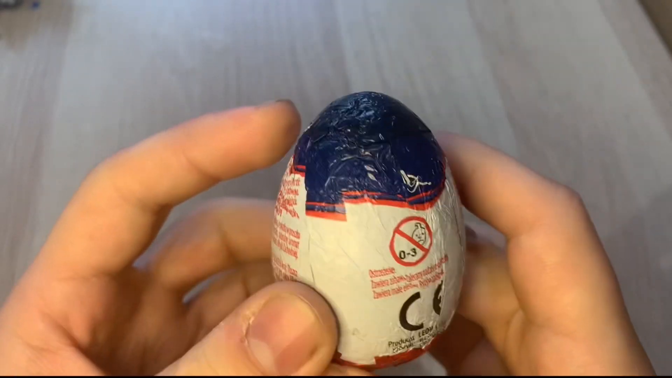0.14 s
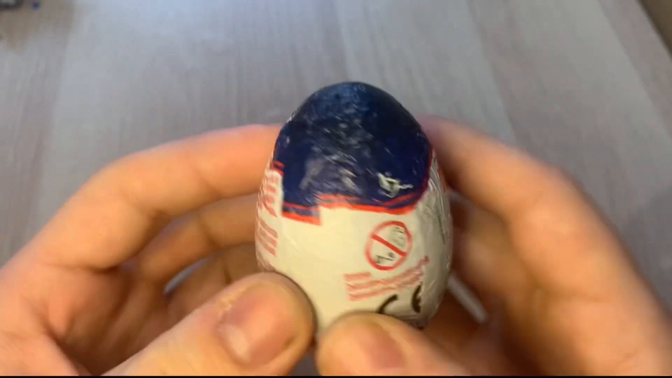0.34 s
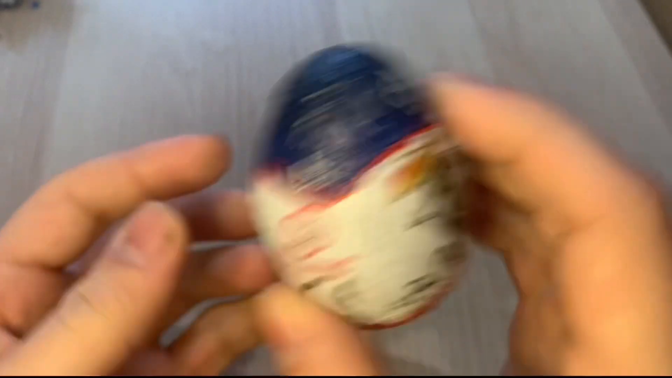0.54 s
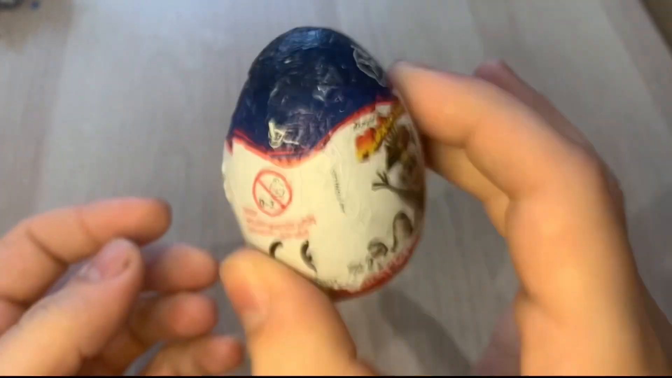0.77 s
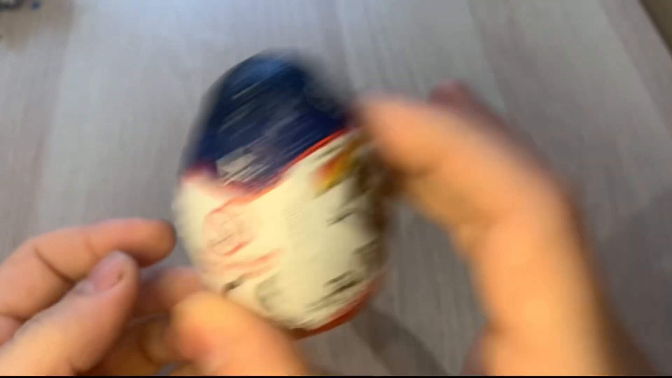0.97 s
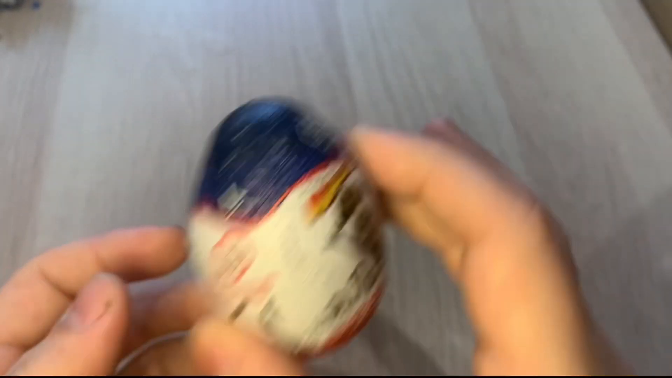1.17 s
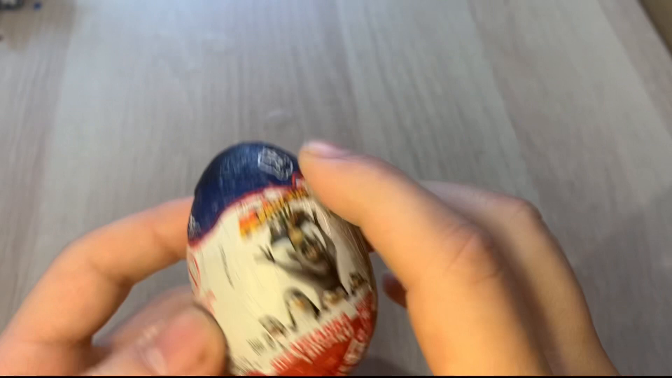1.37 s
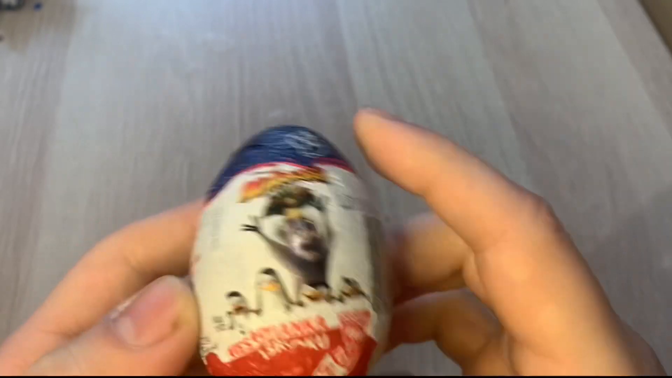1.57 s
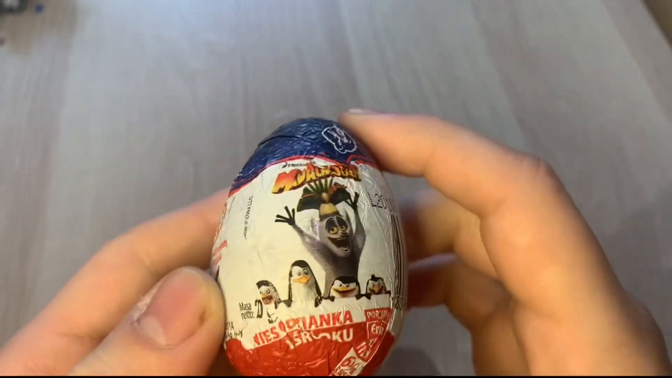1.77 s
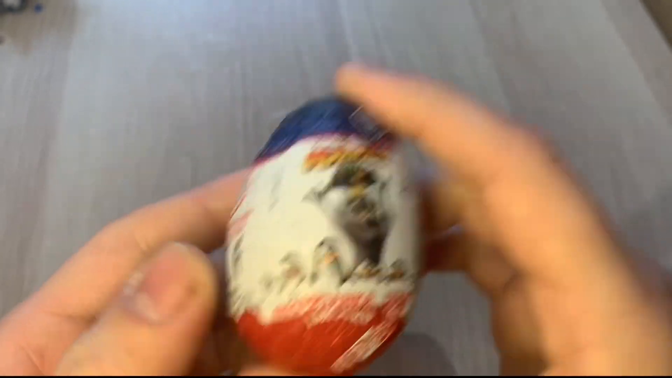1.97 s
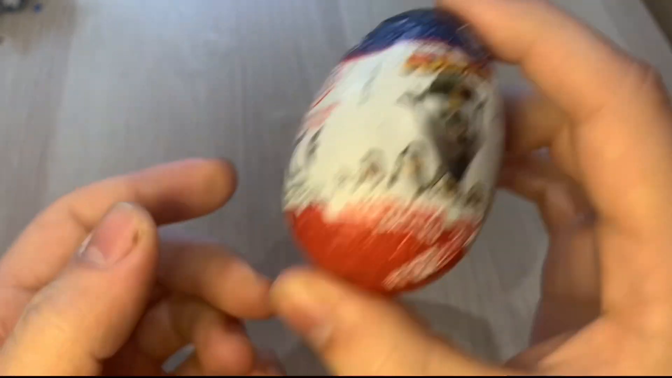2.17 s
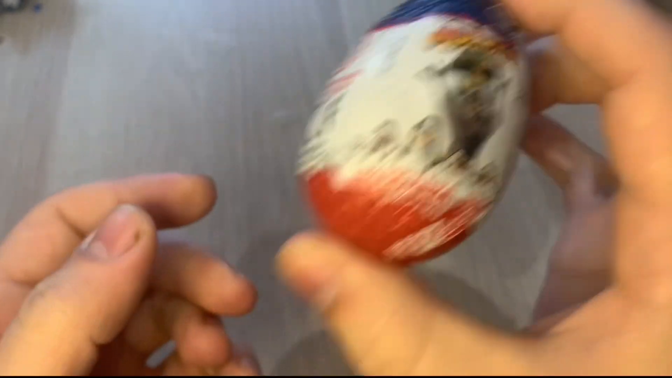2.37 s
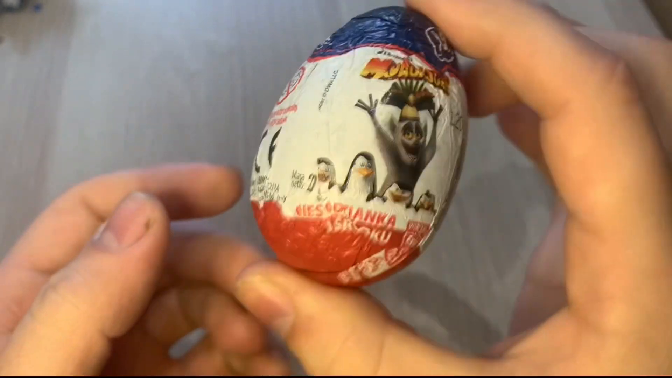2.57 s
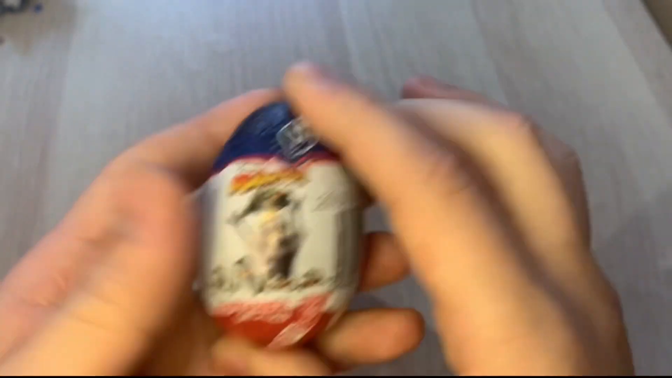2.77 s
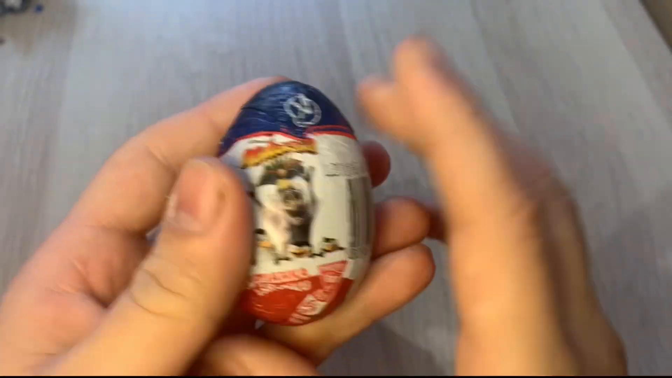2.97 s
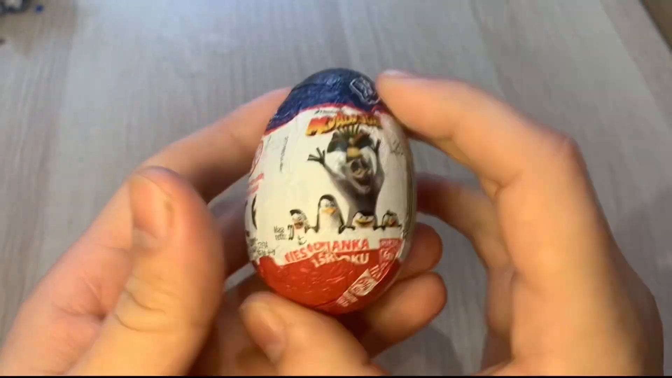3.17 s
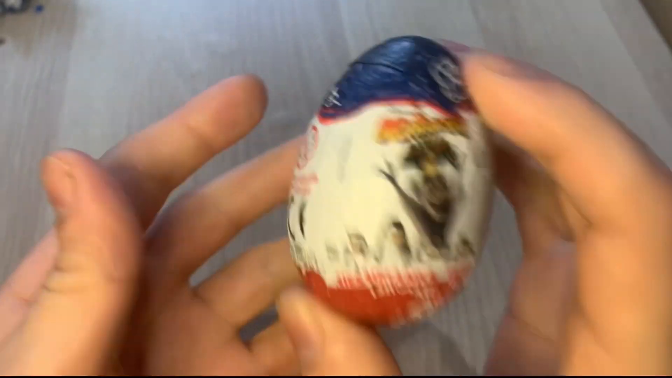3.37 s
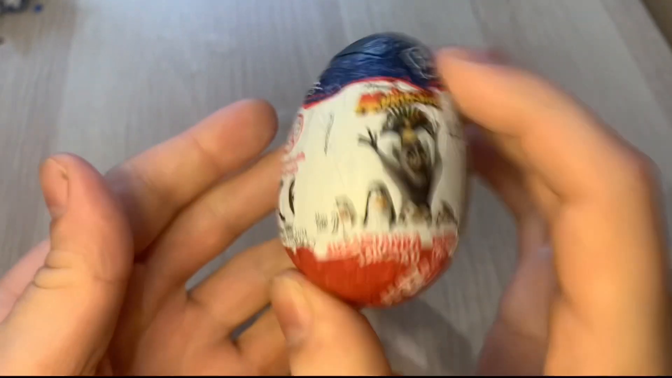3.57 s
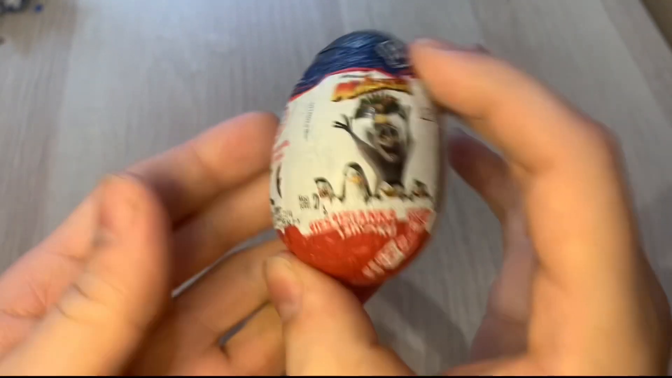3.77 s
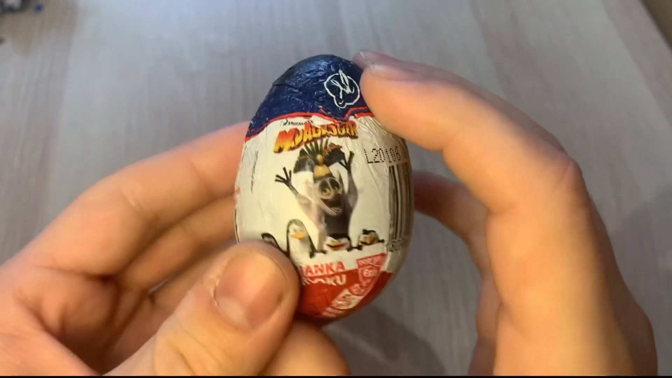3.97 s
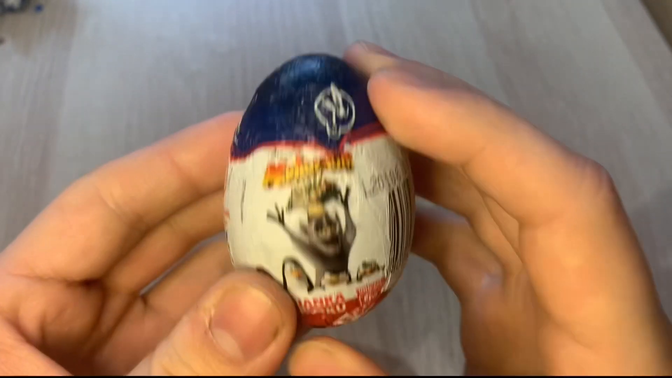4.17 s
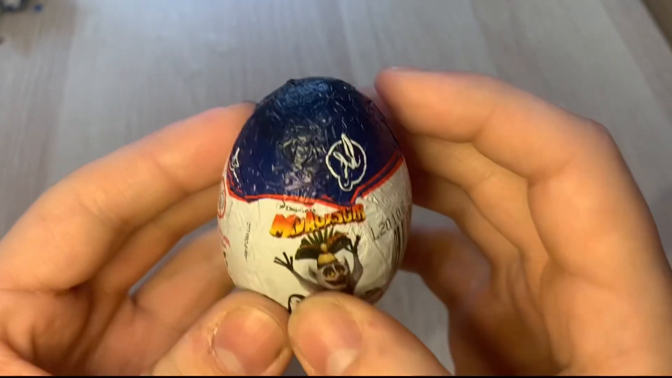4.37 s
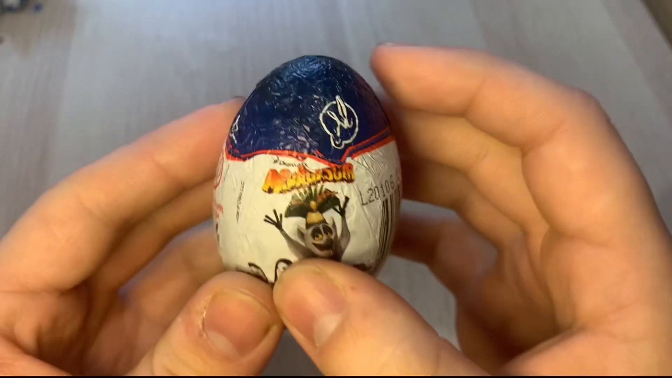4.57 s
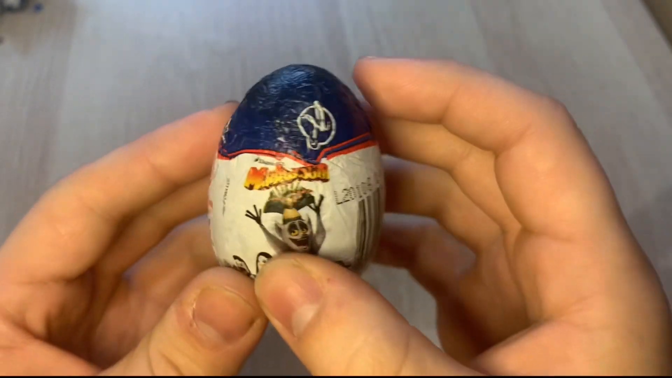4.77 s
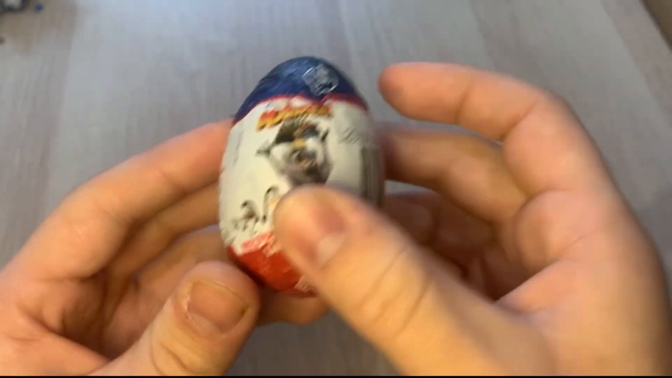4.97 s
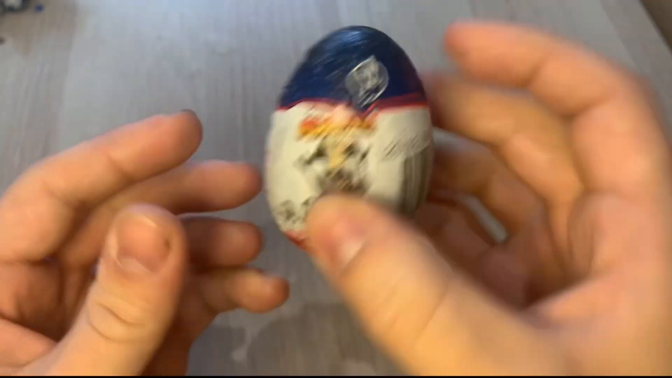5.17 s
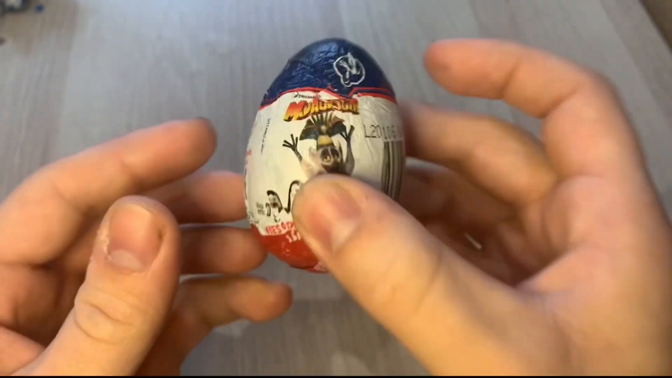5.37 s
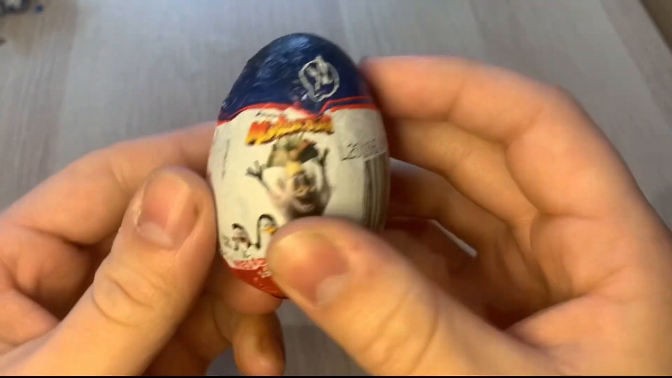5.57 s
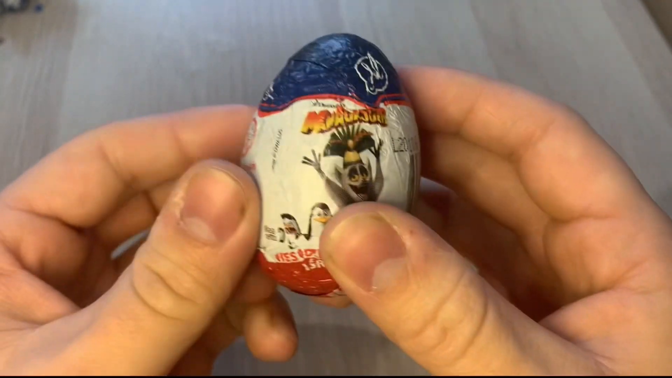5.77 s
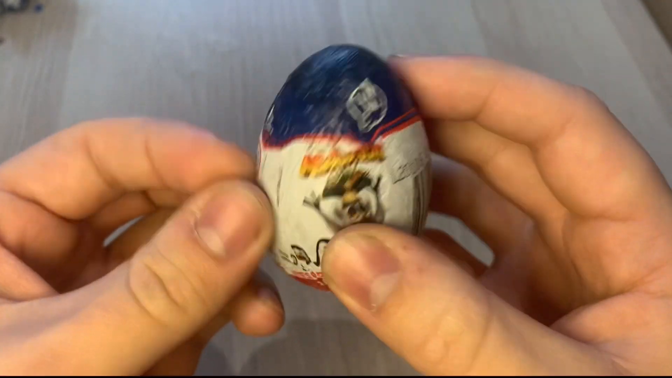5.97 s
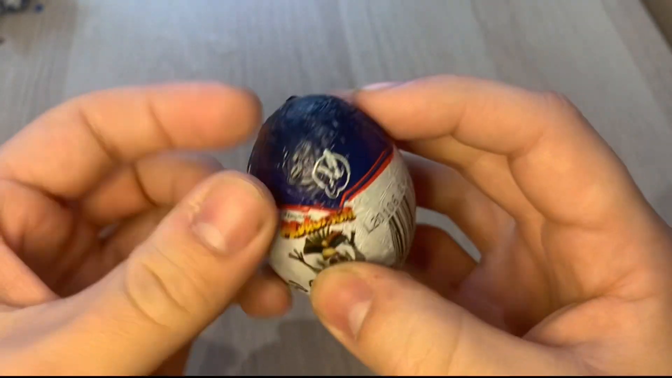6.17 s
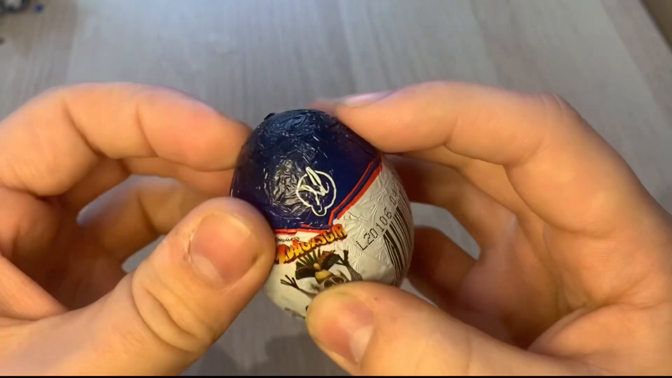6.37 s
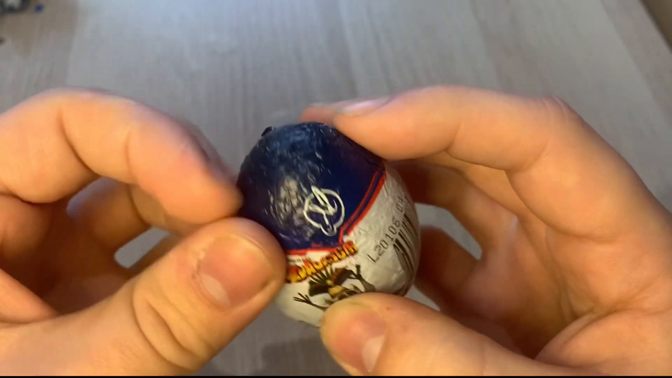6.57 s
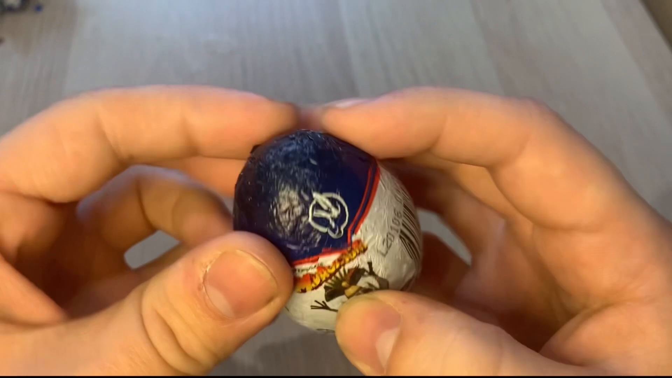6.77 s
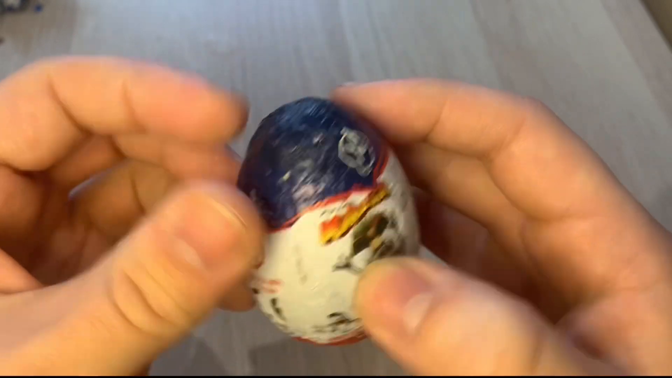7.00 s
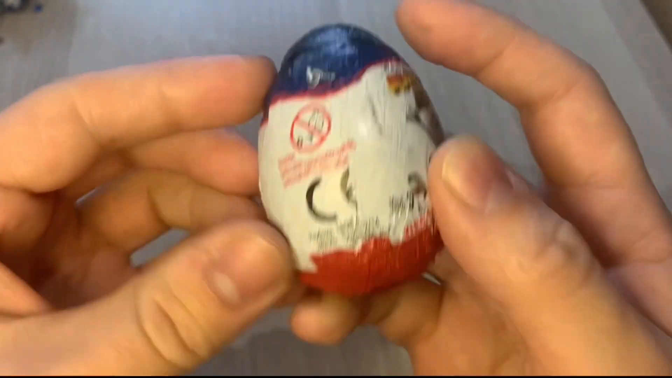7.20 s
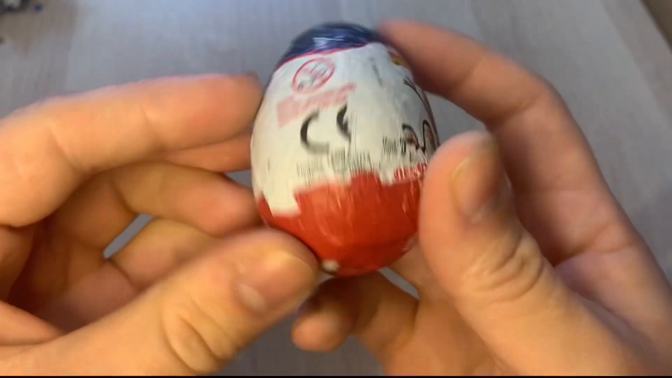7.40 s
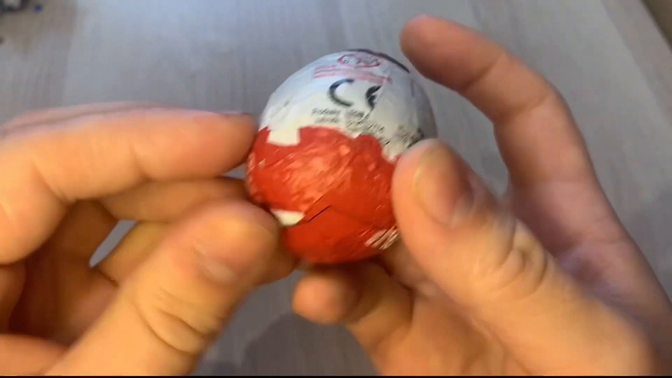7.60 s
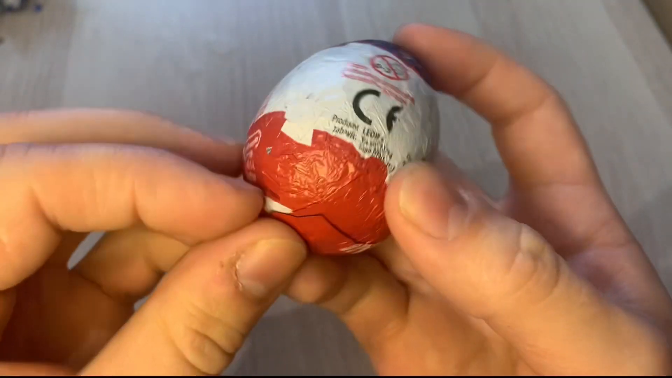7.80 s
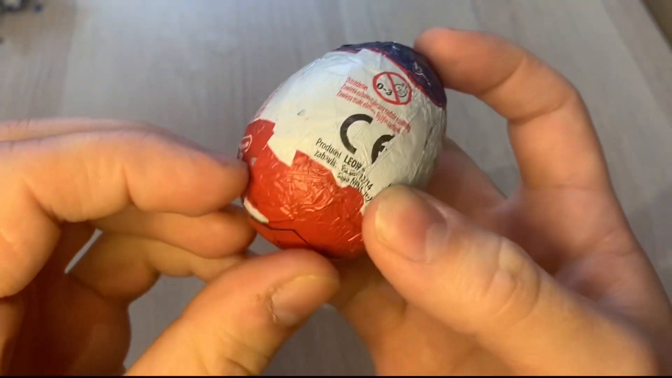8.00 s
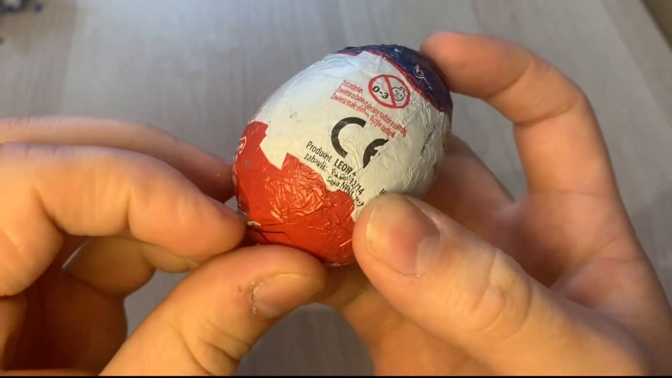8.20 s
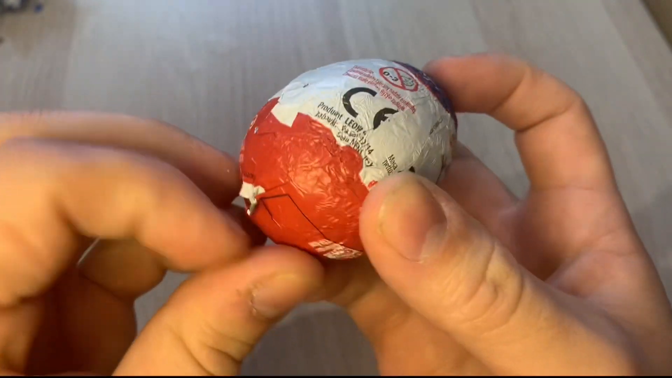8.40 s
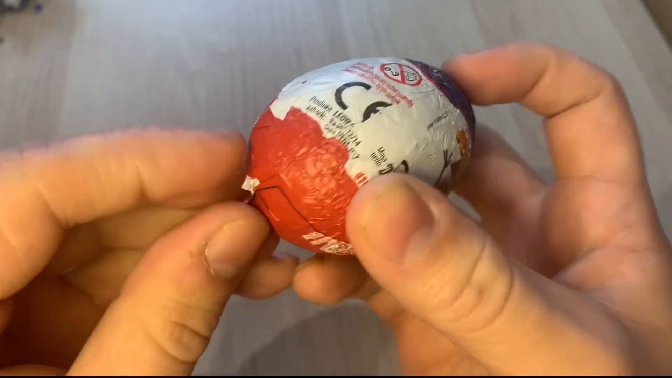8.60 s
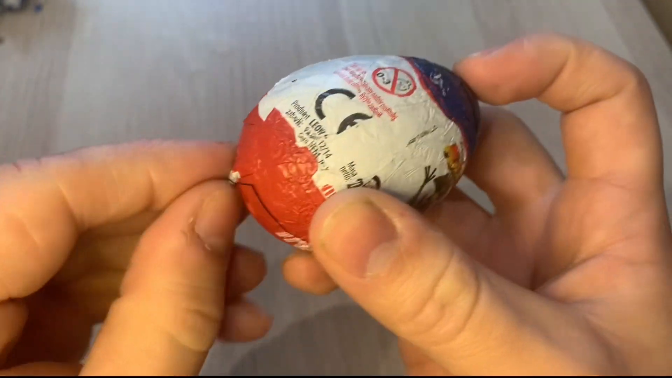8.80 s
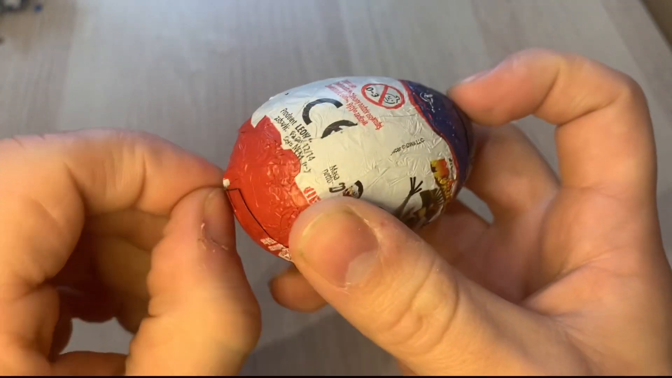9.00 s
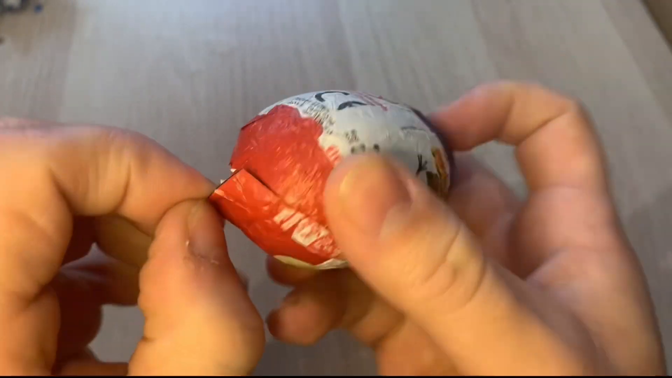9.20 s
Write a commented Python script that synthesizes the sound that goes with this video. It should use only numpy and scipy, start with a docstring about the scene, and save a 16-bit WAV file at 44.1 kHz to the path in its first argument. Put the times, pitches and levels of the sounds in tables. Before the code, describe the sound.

Hands handle a hollow foil-wrapped egg above a table, close to the microphone. Dry, woody-plastic knocks with crisp foil ticks come in four separate rattles, with soft table thumps and near silence between. Then the rattling stops and the foil crackles: clustered bright pops, small thuds on the shell and short scratchy strokes, ending with a few sharp snaps. Low room rumble stays underneath.

```python
"""In a quiet room, hands hold a foil-wrapped hollow egg above a table, close to a two-port microphone.
The egg is shaken four times: the capsule inside excites the damped modes of the shell and cracks the foil.
Then fingernails pick at the foil, whose creases pop as short noise pulses and rustle as dense random ones.
An arm bumps the table, a decaying low tone with a scrape, over mains hum, low rumble and faint hiss."""
import sys
import numpy as np
from scipy import signal
from scipy.fft import rfft, irfft, next_fast_len
from scipy.io import wavfile
from scipy.ndimage import uniform_filter1d

SR = 44100
rng = np.random.default_rng(int(sys.argv[2]) if len(sys.argv) > 2 else 0)


def inscribe(sig):
    """Save sig as 16-bit PCM at rate SR to the path in sys.argv[1].

    A 1-D sig is mono; a 2-D sig holds one channel per row.
    Samples are clipped to [-1, 1] before scaling.
    """
    pcm = np.round(np.clip(np.atleast_2d(sig).T, -1, 1) * 32767)
    wavfile.write(sys.argv[1], SR, pcm.astype(np.int16))


N = 407925

# room noise spectrum, before scaling to HUSH_DB: [f/Hz, level/dB]
HUSH_SPECTRUM = [(25, -23.5), (50, -10), (100, -17), (200, -20), (600, -32.5), (2000, -35.5), (7000, -36),
                 (16000, -33.5)]
# share of the room noise power common to both ports, limited to 0..1: [f/Hz, share]
HUSH_SHARED = [(60, 0.25), (200, 0.18), (1500, 0.091), (7000, 1)]
# phase by which the left port leads: [f/Hz, phase/rad]
PORT_LEAD = [(0, 0), (690, 1.5), (1460, 0.19), (2240, 1.11), (3620, 1.5), (16500, 20.5)]
# shading between the ports: [f/Hz, left minus right level/dB]
PORT_TILT = [(100, -1.5), (450, -7.5), (1400, -0.5), (3000, -2), (7000, 0.5)]
# reverberation time by band: [f/Hz, t60/s]
ROOM_T60 = [(300, 0.34), (2000, 0.14), (10000, 0.057)]
# arm on the table: [full weight t/s, landing time t/s, boom level/dB, scrape level/dB]
BUMPS = [(1.751, 0.06, -39, -40), (1.906, 0.15, -45, -59.5), (4.127, 0.016, -42, -69)]
# resonances of the scraped table top: [f/Hz, bandwidth f/Hz, relative level/dB]
TABLE_MODES = [(225, 44, 5), (331, 32, -1.5), (487, 63, 4), (584, 9.1, 4.5)]
# spectrum of the sleeve's own scrape: [f/Hz, relative level/dB]
SLEEVE_SPECTRUM = [(600, -7), (2100, -13.5), (5000, -33)]
# mean shell modes, before the chance of each blow: [ratio to ring frequency, relative level/dB, t60/s]
SHELL_MODES = [(.35, -19, 0.033), (.65, -5, 0.0074), (.9, 3, 0.012), (1.1, 6.5, 0.0063), (1.5, 0, 0.0095),
               (2.2, -9, 0.0078)]
# mean spectrum of a foil tick under a knock: [f/Hz, relative level/dB]
TICK_SPECTRUM = [(1500, -8.5), (3500, 3), (6500, 2), (9500, 1.5), (12000, -6.5), (16000, -8)]
# mean spectrum of picked and stroked foil: [f/Hz, relative level/dB]
FOIL_SPECTRUM = [(1200, -42.5), (2500, -20), (5000, -5.5), (8000, -2.5), (12000, -0.5), (16000, 3)]
# spectrum of skin on the hollow shell: [f/Hz, relative level/dB]
SCUFF_SPECTRUM = [(150, -3.5), (500, -6.5), (1400, 1), (2300, -4.5), (3500, -20), (6000, -29)]
# soft fingertip landings on the shell: [t/s, peak level/dB]
TAPS = [(4.148, -51), (4.4, -58), (7.712, -46), (7.766, -53), (7.883, -50.5), (8.543, -65)]
# a finger slips on the shell: (start t/s, count, mean interval t/s, mean peak level/dB)
CREAK = (5.522, 7, .0062, -47)
# finger strokes on the foil, before smoothing: [t/s, length t/s, fizz level/dB, scuff level/dB]
STROKES = [(0.177, 0.058, -67, -58.5), (0.426, 0.057, -56, -71), (1.341, 0.054, -57, -61),
           (1.405, 0.42, -72, -64.5), (4.274, 0.088, -67.5, -96), (5.433, 0.17, -86.5, -65.5),
           (5.741, 0.97, -67.5, -87), (5.748, 0.11, -69, -83), (5.957, 0.066, -52.5, -61),
           (5.979, 0.033, -43, -58.5), (6.031, 0.1, -56, -70.5), (6.209, 0.088, -52, -72),
           (6.51, 0.037, -49, -56.5), (6.641, 0.06, -55, -69), (6.728, 0.26, -61, -73.5),
           (6.847, 0.068, -41, -58), (6.93, 0.024, -47, -59), (7.201, 0.12, -52, -73),
           (7.523, 0.039, -57.5, -81), (7.711, 0.035, -67, -62), (7.767, 0.04, -57.5, -64.5),
           (7.817, 0.062, -57.5, -67.5), (7.934, 0.051, -57, -82), (7.985, 0.069, -67, -78),
           (8.053, 0.03, -45, -56), (8.099, 0.018, -41.5, -76), (8.288, 0.047, -39.5, -80),
           (8.5, 0.046, -59.5, -86), (8.603, 0.021, -51.5, -75), (8.757, 0.11, -68, -95),
           (9.208, 0.06, -41.5, -67.5)]
# single foil snaps under the nail, loud and faint: [t/s, peak level/dB, shell thud peak level/dB]
SNAPS = [(0.0573, -40.5, -76.0), (0.4, -36.5, -75), (2.9228, -33.5, -45), (3.054, -40, -44),
         (3.1108, -41, -56), (4.362, -40, -58.5), (5.8229, -36, -58), (5.888, -44, -76.0),
         (5.9567, -38, -59), (5.993, -37, -45.0), (5.9998, -31, -36.5), (6.0824, -40, -59.0),
         (6.11, -35.0, -58.0), (6.2156, -35, -62), (6.342, -34, -51.5), (6.5176, -28, -62),
         (6.627, -33, -68), (6.6453, -22.5, -53), (6.6822, -33, -67), (6.758, -37, -47),
         (6.7747, -34.5, -56), (6.7961, -30.5, -51.5), (6.838, -27, -51), (6.85, -36, -53),
         (6.8549, -40, -36.5), (6.8786, -35, -36), (6.889, -40, -37), (6.9054, -36, -47),
         (6.9298, -33, -67), (6.947, -29.5, -48), (7.178, -24, -41), (7.301, -45, -40), (7.327, -40, -54),
         (7.445, -43.5, -73), (7.64, -35, -60), (7.7212, -30, -33), (7.821, -35, -44), (7.834, -29, -37),
         (7.8577, -35, -51.0), (7.9905, -21, -70), (8.0615, -23, -49), (8.0735, -38, -54.0),
         (8.0997, -26.5, -52), (8.111, -32, -52), (8.2269, -43.5, -80), (8.2717, -39.5, -70),
         (8.294, -30, -37), (8.3285, -44, -69), (8.3408, -33, -62), (8.5088, -32, -73), (8.7956, -36, -71),
         (8.846, -40, -81.0), (8.9424, -34, -78), (8.9613, -37.5, -80), (9.1852, -33, -60),
         (9.1988, -23, -58), (9.209, -29.5, -48), (9.2387, -28, -46.5)]
# shakes, chatter before rebounds: [start t/s, end t/s, level at start/dB, level at end/dB]
SHAKES = [(0.533, 1.305, -49.5, -51), (2.135, 2.868, -59, -57), (3.447, 3.985, -50, -58),
          (5.163, 5.41, -53.5, -55)]
# single capsule knocks, loud ones in the shakes and faint ones between them:
# [t/s, peak level/dB, foil tick peak level/dB, shell ring f/Hz]
KNOCKS = [(0.1936, -38.5, -32, 710), (0.4107, -42, -66, 1200.0), (0.4644, -26, -33, 1190),
          (0.5384, -20, -16.5, 1620), (0.5469, -21.5, -14.5, 1250), (0.557, -20, -21, 1250),
          (0.5742, -23.5, -23, 1470), (0.5796, -19, -14.5, 1120), (0.6015, -26.5, -26.5, 885),
          (0.6102, -27, -52, 1090), (0.6305, -28, -35, 1510), (0.6519, -26.5, -34, 990),
          (0.6572, -23.5, -23.5, 1470), (0.667, -16.5, -15.5, 1510), (0.6738, -17, -17.5, 1160),
          (0.6999, -28, -30.5, 1070), (0.7218, -27.5, -19.5, 1180), (0.7396, -17, -22.5, 945),
          (0.7627, -18, -15.5, 1530), (0.7676, -18.0, -18.5, 1300), (0.8027, -21, -34.5, 1070),
          (0.8189, -15.5, -18.5, 980), (0.8559, -20.0, -25.5, 1610), (0.8621, -17, -18, 1220),
          (0.8715, -32, -24, 1280.0), (0.8838, -24.5, -19, 930), (0.8927, -20.5, -25.5, 1170),
          (0.931, -16, -14, 1480), (0.9369, -16, -18.5, 1120), (0.9617, -23, -23, 1480),
          (0.973, -13.5, -11, 1260), (0.9933, -18.5, -21, 1180), (1.0341, -23, -35.5, 1230.0),
          (1.0403, -20, -29, 970), (1.0842, -18, -22.5, 1180), (1.1003, -18, -13, 1450.0),
          (1.1145, -23, -39, 1040), (1.1523, -23, -31, 1190), (1.1777, -20, -21.5, 1220.0),
          (1.1828, -25.5, -26.5, 1240), (1.195, -19.5, -20.5, 1190), (1.2306, -24.5, -26, 1080),
          (1.2926, -19.5, -23.5, 1480), (1.3683, -36.5, -56, 700.0), (1.5723, -43, -44.5, 1380),
          (1.9282, -45, -54, 1260.0), (1.9775, -44.5, -52.5, 1255), (2.0761, -39, -40.5, 1080),
          (2.1146, -30, -61, 930), (2.1514, -24.5, -32, 855), (2.164, -25, -43, 1000.0),
          (2.2283, -31.0, -53, 1150), (2.2541, -27.5, -33.5, 870), (2.3025, -31.5, -34.5, 680),
          (2.3174, -30.5, -30, 740), (2.3583, -25.5, -20.0, 1070), (2.3661, -21.5, -27.5, 1020),
          (2.4515, -33, -42, 1140), (2.4682, -26.0, -31.5, 790.0), (2.5217, -29.5, -29.5, 670),
          (2.5278, -31.5, -37, 895), (2.5589, -22.5, -33, 860.0), (2.5724, -23, -22, 1030),
          (2.5862, -21, -32, 840), (2.6107, -28.5, -29, 824), (2.6685, -26, -34.5, 940),
          (2.6886, -24.5, -24.5, 850), (2.7154, -25.5, -57, 1030), (2.831, -25.5, -27.5, 880),
          (2.8807, -29.5, -32.5, 1570), (3.2878, -40, -47.5, 760.0), (3.4008, -15.5, -27.5, 1240),
          (3.4055, -16, -18.5, 1120), (3.4526, -20, -27.5, 1460), (3.4629, -17, -14, 1780),
          (3.5346, -13.5, -24.0, 1526), (3.5407, -23.5, -29, 1180), (3.5677, -23, -33, 750),
          (3.5812, -23.5, -41.5, 840.0), (3.6138, -15.5, -24, 1400), (3.6306, -17.5, -40, 980),
          (3.6435, -21.5, -20, 1650), (3.6535, -23.5, -39, 990), (3.665, -18, -19.5, 1610),
          (3.6833, -21.5, -36.5, 900), (3.7485, -18.5, -27, 1360), (3.7538, -17, -20.5, 1110.0),
          (3.7734, -20, -25, 950), (3.7891, -22, -28.5, 800.0), (3.7959, -21.5, -28.5, 1380),
          (3.864, -19.5, -32, 1230), (3.8932, -23.5, -23, 900), (3.9036, -24.5, -37.5, 1060.0),
          (3.9813, -26.0, -40.5, 1175), (5.1289, -24.5, -28.5, 1280), (5.1446, -24.5, -30.5, 1210),
          (5.1734, -23, -34.5, 1110), (5.2046, -30, -27, 1260), (5.2336, -25.5, -35.5, 1370),
          (5.2591, -28, -54, 1240), (5.2711, -21, -38, 1170), (5.2802, -16.5, -18.5, 1206),
          (5.3007, -29.5, -24.5, 1180), (5.3379, -21.5, -28.5, 1290), (5.3778, -27, -31.0, 1160),
          (5.4053, -21.5, -21.0, 1570)]

HUSH_DB = -72  # rms, without the mains tone
SHELF_HZ, EDGE_HZ = 15800, 16850  # weak above the shelf, cut above the edge
BOOM_HZ, SAG_HZ_PER_S = 65, 15
BOOM_RISE_DB = 20  # over the landing time
BOOM_FALL_DB_PER_S, SCRAPE_FALL_DB_PER_S = 419, 289  # after full weight
SWING_IN_DB_PER_S, SWING_OUT_DB_PER_S = 348, 181.5  # chatter swells before a shake, dies after it
REBOUND_S, LULL_DB = 0.0053, -1  # decay time constant; chatter gain far from single knocks


def gain_of(db):
    """Level definition: decibels to amplitude ratio."""
    return 10 ** (np.asarray(db) / 20)


def evened(x):
    """Power normalisation: scales to rms 1."""
    return x / np.sqrt(np.mean(x ** 2) + 1e-20)


def read(points, hz):
    """Spectral interpolation on a logarithmic frequency axis."""
    f, value = np.transpose(points)
    return np.interp(np.log(hz + 1), np.log(f + 1), value)


def coloured(x, points):
    """Linear filtering: multiplies the spectrum by a (f/Hz, level/dB) table."""
    size = next_fast_len(x.shape[-1])
    gain = gain_of(read(points, np.fft.rfftfreq(size, 1 / SR)))
    return irfft(rfft(x, size) * gain, size)[..., :x.shape[-1]]


def add(mix, s, sound):
    """Superposition: adds a sound in place from time s on."""
    part = mix[round(s * SR):][:len(sound)]
    part += sound[:len(part)]


def sparse(per_s, spread_db):
    """Random impulse process: clicks of either sign, a few of them large."""
    size = gain_of(spread_db * np.minimum(rng.exponential(1, N), 4))
    happens = rng.random(N) < per_s / SR
    return size * happens * rng.choice([-1., 1.], N)


def ports(x):
    """Two-point reception: a near source reaches each port with its own phase and shading."""
    size = next_fast_len(N + 1000)
    hz = np.fft.rfftfreq(size, 1 / SR)
    phase = np.interp(hz, *np.transpose(PORT_LEAD))
    left = np.exp(.5j * phase) * gain_of(.5 * read(PORT_TILT, hz))
    return irfft(rfft(x, size) * np.array([left, 1 / left]), size)[:, :N]


def hush():
    """Partial coherence: rumble and hiss partly shared by the ports, with a wavering mains hum."""
    size = next_fast_len(N)
    same = np.clip(read(HUSH_SHARED, np.fft.rfftfreq(size, 1 / SR)), 0, 1)
    shared = rfft(ports(rng.standard_normal(N)), size)
    own = rfft(rng.standard_normal((2, N)), size)
    mixed = irfft(np.sqrt(same) * shared + np.sqrt(1 - same) * own, size)[:, :N]
    t = np.arange(N) / SR
    drift = uniform_filter1d(uniform_filter1d(rng.standard_normal(N), 4000), 4000)
    waver_db = 2.8 * evened(drift)
    fade_db = np.interp(t, [8.6, 9.25], [0, -12])  # the hum weakens at the end
    mains = gain_of(-71.5 + waver_db + fade_db) * np.sin(2 * np.pi * 50 * t)
    return gain_of(HUSH_DB) * evened(coloured(mixed, HUSH_SPECTRUM)) + mains


def room(x):
    """Reverberation: sparse random-sign reflections, each band with its own decay, unlike at the ports."""
    taps = np.zeros((2, SR // 2))
    slots = np.arange(300, SR // 2 - 20, 20)
    at = slots + rng.integers(0, 20, (2, (SR // 2 - 301) // 20))  # one reflection per 20-sample slot
    np.put_along_axis(taps, at, rng.choice([-1., 1.], at.shape), 1)
    hz, t, z = signal.stft(taps, SR, nperseg=256)
    decay = gain_of(-60 * t / read(ROOM_T60, hz)[:, None])
    tail = signal.istft(z * decay, SR, nperseg=256)[1]
    return signal.oaconvolve(x[None], tail / np.linalg.norm(tail[0]), axes=1)[:, :N]


def bumps():
    """Forced and free vibration: the table top booms as weight lands, then decays; the sleeve scrapes."""
    out = np.zeros(N)
    for (s, land, boom_db, scrape_db), c in zip(BUMPS, rng.standard_normal((len(BUMPS), SR // 3))):
        t = np.arange(len(c)) / SR
        after = t - land
        boom = np.sqrt(2) * np.sin(2 * np.pi * (BOOM_HZ * t - SAG_HZ_PER_S * t ** 2 / 2))
        boom *= gain_of(boom_db + np.minimum(BOOM_RISE_DB * after / land, -BOOM_FALL_DB_PER_S * after))
        rings = 0
        for hz, width, db in TABLE_MODES:
            resonance = signal.iirpeak(hz, hz / width, SR)
            rings = rings + gain_of(db) * evened(signal.filtfilt(*resonance, c))
        scrape = evened(rings + 16.4 * coloured(c, SLEEVE_SPECTRUM))
        scrape *= gain_of(scrape_db - SCRAPE_FALL_DB_PER_S * np.maximum(after, 0))
        touch = np.minimum(t / (0.46 * land), 1)
        add(out, s - land, (boom + scrape) * touch)
    return out


def shell(hz, chance):
    """Modal superposition: damped shell modes, weighted and tuned by chance at every blow; peak 1."""
    t = np.arange(1400) / SR
    ring = 0
    for (ratio, db, t60), c in zip(SHELL_MODES, chance):
        envelope = gain_of(db + 3.2 * c - 60 * t / t60)
        ring = ring + envelope * np.sin(2 * np.pi * hz * ratio * (1 + 0.052 * c) * t)
    ring *= 1 - np.exp(-t / 0.0004)  # softens the onset
    return ring / abs(ring).max()


def crack(chance, length, colour):
    """Impulsive release: a creased foil pops as a brief noise puff of chance brightness; peak 1."""
    t = np.arange(len(chance)) / SR / length  # in units of the rise time, length in s
    own = [(hz, db + 4.7 * c) for (hz, db), c in zip(colour, chance[::-1])]
    own += [(EDGE_HZ, -40)]
    pop = coloured(chance * t * np.exp(-t), own)
    return pop / abs(pop).max()


def taps():
    """Soft-contact excitation: fingertip pads ring the shell at a low pitch."""
    out = np.zeros(N)
    for (s, db), c in zip(TAPS, rng.standard_normal((len(TAPS), len(SHELL_MODES)))):
        add(out, s, gain_of(db) * shell(560, c))
    return out


def creak():
    """Stick-slip: a short run of dull, slightly uneven slips, each a push on the damped shell."""
    out = np.zeros(N)
    s, count, step, db = CREAK
    for k, c in enumerate(rng.standard_normal((round(count), len(SHELL_MODES)))):
        add(out, s + step * (k + 0.13 * c[0]), gain_of(db + c[1]) * shell(580, c))
    return out


def patchy(x, patchy_db):
    """Time-varying filtering: the colour drifts in patches as the contact moves over the creases."""
    z = signal.stft(x, nperseg=256)[2]
    across_hz = uniform_filter1d(rng.standard_normal(z.shape), size=12, axis=0)
    patches = evened(uniform_filter1d(across_hz, size=8, axis=1))
    return signal.istft(z * gain_of(patchy_db * patches), nperseg=256)[1][:N]


def rustle():
    """Frictional noise: skin and nail slide on foil, a dense, clumped fizz of tiny creases per stroke."""
    effort = np.zeros((2, N))  # fizz, scuff
    for s, length, fizz_db, scuff_db in STROKES:
        effort[:, round(s * SR):round((s + length) * SR)] += gain_of([[fizz_db], [scuff_db]])
    # a stroke swells in and out over some 8 ms; a weak settling of the foil trails behind it
    settle = np.exp(-1 / (0.031 * SR))
    settling = signal.lfilter([1 - settle], [1, -settle], effort)
    effort = uniform_filter1d(effort, 350) + 0.07 * settling
    clumps = gain_of(0.83 * evened(uniform_filter1d(rng.standard_normal(N), 300)))
    fizz = np.zeros(N)
    for _ in range(8):
        clicks = sparse(90, spread_db=2.8)
        fizz += signal.oaconvolve(clicks, crack(rng.standard_normal(256), 0.00025, TICK_SPECTRUM))[:N]
    grain = patchy(evened(fizz) + .7 * rng.standard_normal(N), patchy_db=3.0)
    return sum(evened(coloured(grain, colour) * clumps) * e
               for colour, e in zip((FOIL_SPECTRUM, SCUFF_SPECTRUM), effort))


def snaps():
    """Snap-through: a crease pops under the nail and thuds into the shell below it."""
    out = np.zeros(N)
    for (s, db, shell_db), c in zip(SNAPS, rng.standard_normal((len(SNAPS), 513 + len(SHELL_MODES)))):
        add(out, s, gain_of(db) * crack(c[:512], 0.00054, FOIL_SPECTRUM))
        thud_hz = 1650 * gain_of(2.85 * c[512])
        add(out, s, gain_of(shell_db) * shell(thud_hz, c[513:]))
    return out


def rebounds():
    """Rebound decay: a gain that rises behind each knock, relative to those around it, and dies to the lull."""
    kicks = np.zeros(N)
    s, db, _, _ = np.transpose(KNOCKS)
    kicks[np.round((s + .004) * SR).astype(int)] = np.sqrt(gain_of(db))
    after = signal.lfilter([1], [1, -np.exp(-1 / (REBOUND_S * SR))], kicks)
    return gain_of(LULL_DB) + after / (uniform_filter1d(after, size=SR // 4) + 1e-3)


def rattle():
    """Random impact excitation: around the single knocks the capsule rolls and chatters, shaking the foil."""
    out = np.zeros(N)
    for hz in np.geomspace(800, 1900, 6):
        tap = shell(hz, rng.standard_normal(len(SHELL_MODES)))
        add(tap, 0, gain_of(-7.5) * crack(rng.standard_normal(512), 0.0022, TICK_SPECTRUM))
        out += signal.oaconvolve(sparse(45, spread_db=2.8), tap)[:N]
    t = np.arange(N) / SR
    level = np.zeros(N)
    for start, end, first_db, last_db in SHAKES:
        db = np.interp(t, [start, end], [first_db, last_db])
        db -= SWING_IN_DB_PER_S * np.maximum(start - t, 0)
        db -= SWING_OUT_DB_PER_S * np.maximum(t - end, 0)
        level += gain_of(db)
    return evened(out) * level * rebounds()


def knocks():
    """Impact excitation: each capsule knock rings the shell and cracks the foil that lies on it."""
    out = np.zeros(N)
    chances = rng.standard_normal((len(KNOCKS), 512 + len(SHELL_MODES)))
    for (s, db, tick_db, hz), c in zip(KNOCKS, chances):
        add(out, s, gain_of(db) * shell(hz, c[512:]))
        add(out, s, gain_of(tick_db) * crack(c[:512], .0006, TICK_SPECTRUM))
    return out


def scene():
    """Superposition of fields: egg and foil, direct and reflected, with the table and the room."""
    egg = knocks() + rattle() + snaps() + rustle() + creak() + taps()
    egg = coloured(egg, [(25, -15.5), (90, 2.0)])  # the egg's sounds are thinned below about 90 Hz
    return ports(egg + bumps()) + gain_of(-17.5) * room(egg) + hush()


def record(dry):
    """Dispersion and band limiting: bass arrives late, so clicks sweep down; the top is weakened, then cut."""
    size = next_fast_len(N + SR)
    hz = np.fft.rfftfreq(size, 1 / SR)
    # delay in s = 1.5 / (Hz + 100), counted from the arrival of 2 kHz
    late = np.exp(-2j * np.pi * 1.5 * (np.log(1 + hz / 100) - hz / 2100))
    swept = irfft(rfft(dry, size) * late, size)[:, :N]
    shelf = signal.firwin2(601, [0, SHELF_HZ - 200, SHELF_HZ + 200, SR / 2], [1, 1, .15, .15], fs=SR)
    edge = signal.firwin(511, EDGE_HZ, window=("kaiser", 9), fs=SR)
    return signal.oaconvolve(swept, np.convolve(shelf, edge)[None], "same")


dry = scene()
out = record(dry)
inscribe(out)
```